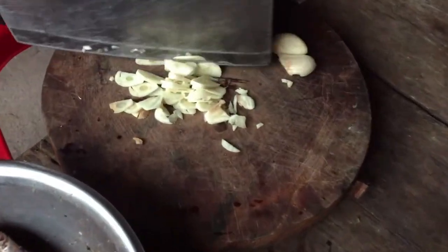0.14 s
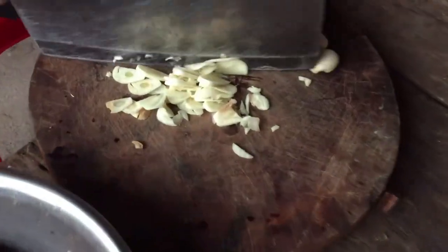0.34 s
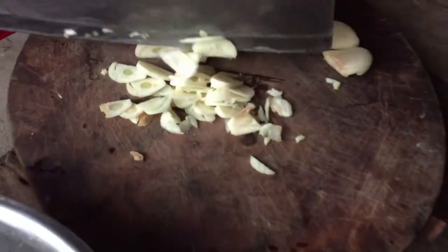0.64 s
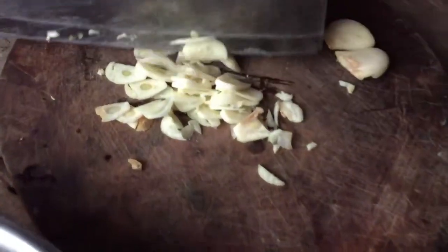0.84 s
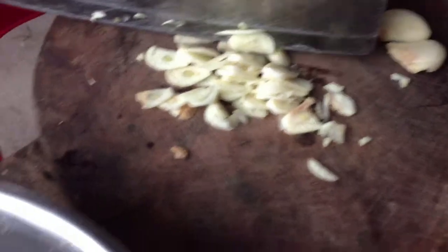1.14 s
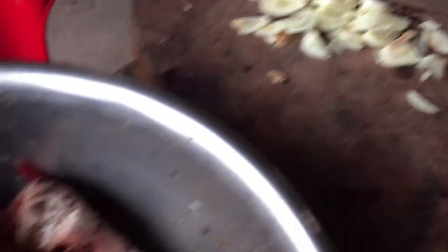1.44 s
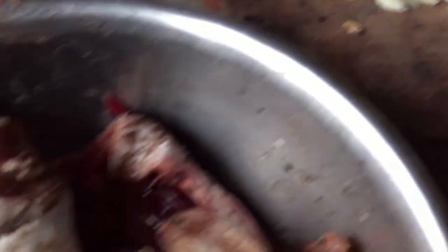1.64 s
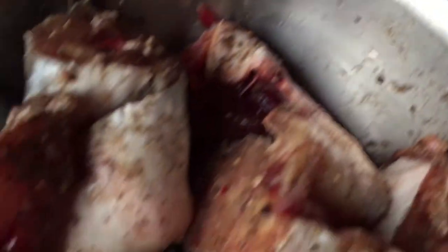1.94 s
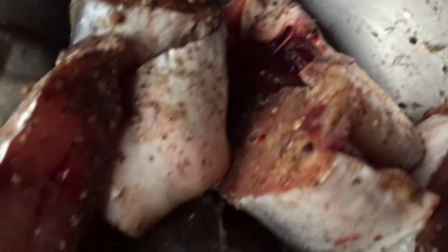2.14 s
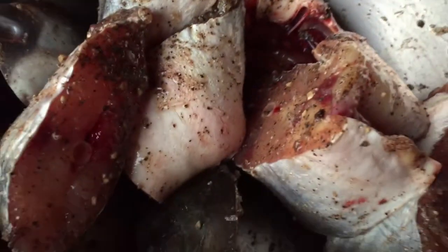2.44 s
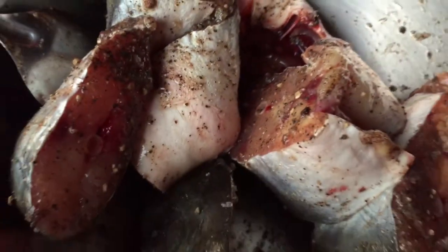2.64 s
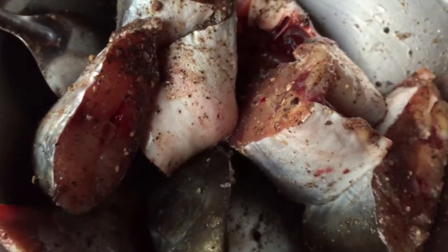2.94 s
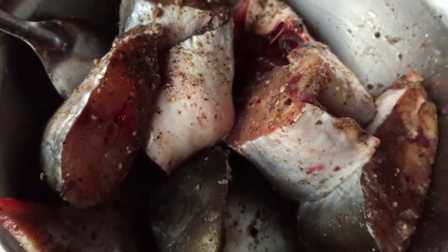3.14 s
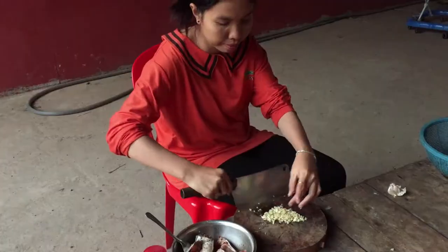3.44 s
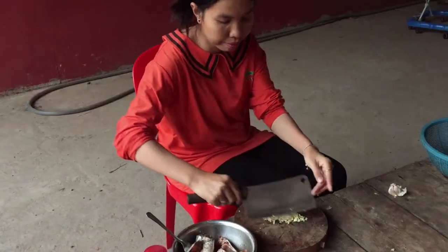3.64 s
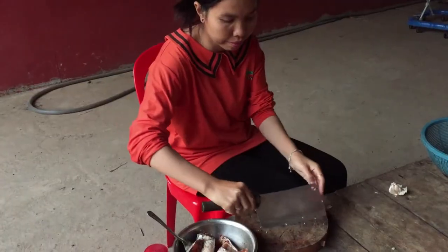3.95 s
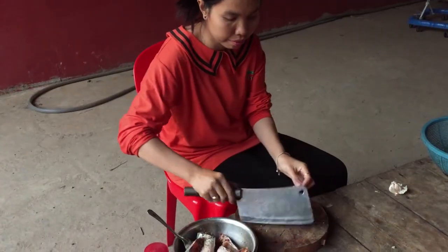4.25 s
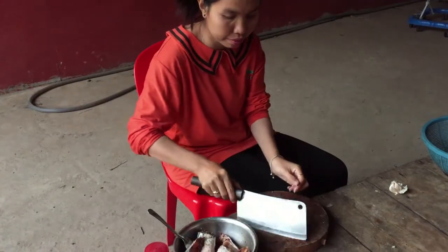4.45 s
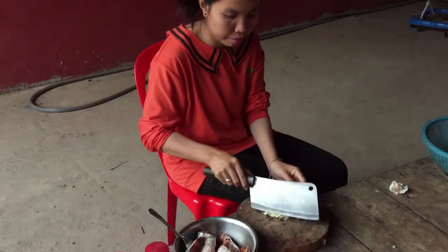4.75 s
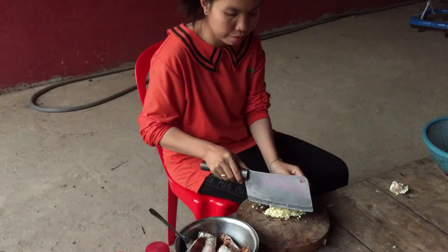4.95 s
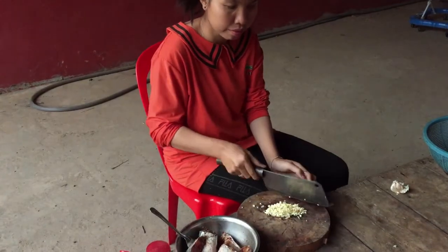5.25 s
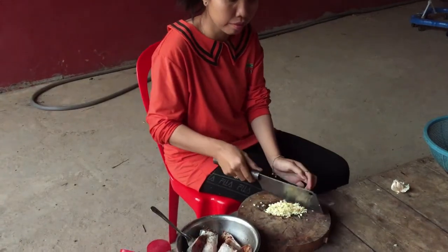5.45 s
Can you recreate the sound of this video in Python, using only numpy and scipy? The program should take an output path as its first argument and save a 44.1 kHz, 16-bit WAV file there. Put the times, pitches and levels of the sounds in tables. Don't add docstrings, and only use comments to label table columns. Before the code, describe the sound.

A close microphone in an open shed catches garlic being cut on a thick wooden board. From 0.2 s a slow, growing crunch with wet snaps leads to a knock at 0.33 s. More crunching brings a low woody knock at 2.0 s, the hardest, sharpest blow at 2.57 s, and a dull one at 3.24 s after a strong crunch. A steel bowl rattles very faintly. Chicks whistle short falling peeps around 4 to 6 kHz throughout, and a hen clucks roughly at 0.06, 0.85, 0.92, 1.5 and 1.66 s, all reverberant. A cut to silence lasts about 0.05 s at 3.37 s. Then, farther off, knocks come at 3.98 s (soft), 4.49 s (loudest of these) and 5.47 s, with scraping blade drags near 4.03, 4.6 and 5.55 s. Low gusty rumble, a distant peeping flock and hiss lie beneath; vehicle noise starts louder at 3.4 s and recedes.

```python
import sys
import numpy as np
from scipy import signal
from scipy.fft import rfft, irfft
from scipy.io import wavfile
from scipy.ndimage import uniform_filter1d

SR = 44100
rng = np.random.default_rng(int(sys.argv[2]) if len(sys.argv) > 2 else 0)


def attenuation_scalar(level_db):
    decades = np.asarray(level_db, float) / 20
    return 10 ** decades


def put_to_file(sound):
    columns = np.atleast_2d(sound).T
    safe = np.clip(columns, -1, 1)
    whole_steps = np.round(safe * 32767)
    wavfile.write(sys.argv[1], SR, whole_steps.astype(np.int16))


N = 246078

# (f/Hz, level/dB, time to fall 60 dB/s)
NEAR_WOOD = [(494, -1.5, 0.014), (585, -4, 0.023), (690, -7.5, 0.029), (847, -9, 0.027), (871.5, 1, 0.011),
             (1048, -7, 0.035), (1095, -7, 0.014), (1185, 1, 0.028), (1340, -11, 0.05), (1585, -4, 0.03),
             (1776, -18, 0.043), (2012, -14, 0.035), (2890, -20, 0.019), (4100, -30, 0.019)]
# (start/s, end/s)
SILENCE = (3.3697, 3.4168)


def near_chops():
    # (t/s, peak level/dB, then re peak: thud/dB, low wood/dB, crack/dB)
    blows = [
        (0.3299, -14, -9, -17, -39),
        (1.9993, -16, -6.5, 13.5, -26),
        (2.5733, -2, -20, -19, -28.5),
        (3.2412, -10, -15.5, -25, -93),
    ]
    landing = [
        [-3, 8, 3, -1, 0.46, -8, -2, -4],
        [5.5, 4, 6.5, -1, -1.1, 6.5, -1, 5.5],
        [-11, 34, 2, 0.9, -1.8, 7, 3.5, 3.5],
        [12, 8, -12, 0.89, 0.15, -19, -18, -2],
    ]
    rebound = [-13.5, -11.5, -9.5, -3]
    bowl_levels = [-38.5, -41, -33, -38.5]
    # (delay/s, level/dB)
    contact = [(0, -4.5), (.00085, -5), (.0017, -1.5), (.00255, -9.5), (.0064, -10)]
    return knocks(blows, landing, rebound, bowl_levels, NEAR_WOOD, contact,
                  board_db=-12.5, thud_db=0.2, tail_db=-17.5, tail_t60=0.068, crack_t60=0.0066, crack_hz=7800)


def far_chops():
    # (t/s, peak level/dB, then re peak: thud/dB, low wood/dB, crack/dB)
    blows = [
        (3.978, -27.5, -22, -2.5, -22),
        (4.487, -15, -43, -12, -32),
        (5.4735, -23.5, -10.5, -6, -25),
    ]
    landing = [
        [1.5, 1, -0.9, 1, -1, 0.91, -1, 1],
        [-2, 1, -1, -2.5, -0.9, 0.86, -1.2, 0.91],
        [3, -1.6, -1.1, 3, -1, -1, -1, 1],
    ]
    rebound = [-4, -14, -13]
    bowl_levels = [-33, -31.5, -32]
    # (delay/s, level/dB)
    contact = [(0, 7.5), (.0014, 11), (.0034, 3.5), (.007, 10), (0.012, -14)]
    # (f/Hz, level/dB, time to fall 60 dB/s)
    board = [(372, 10.5, 0.11), (513, 7, 0.017), (601, 4.5, 0.15), (686, -14, 0.025), (837, -9, 0.08),
             (1015, -17.5, 0.029), (1050, -1, 0.0096), (1176, -10, 0.033), (1340, -10, 0.08),
             (1720, -7, 0.071), (2160, -2.5, 0.031), (2600, 3, 0.02), (2500, 6, 0.018), (2850, -16, 0.091)]
    return knocks(blows, landing, rebound, bowl_levels, board, contact,
                  board_db=-14.0, thud_db=-1.2, tail_db=-23.0, tail_t60=0.17, crack_t60=0.014, crack_hz=5100)


def knocks(blows, landing, rebound_db, bowl_db, board, contact,
           board_db, thud_db, tail_db, tail_t60, crack_t60, crack_hz):
    landing_hz = [470, 620, 830, 1000, 1180, 1550, 2000, 2700]
    # (f/Hz, level/dB, time to fall 60 dB/s)
    table_modes = [(113, -0.5, 0.085), (172.6, 7, 0.031), (180, 8.5, 0.05), (282, 1, 0.042)]
    # (f/Hz, level/dB, time to fall 60 dB/s)
    bowl_modes = [(452, -14, .15), (942, -4, .2), (1040, -7, .35), (1093, -5, .5), (1165, -4, .65),
                  (1215, -7, .4), (1335, -6, .35), (1604, -11, .2), (1771, -13, .2), (1949, -14, .2),
                  (2024, -14, .2), (2180, -19, .15), (860, -6, .15)]
    # (delay/s, level/dB)
    bowl_rings = [
        (0, -7.5),
        (.062, -4.5),
    ]
    # (delay/s, level/dB)
    echoes = [(.0068, -13.5), (0.0139, -15), (0.035, -21), (.066, -25), (0.08, -31)]
    # (f/Hz, level/dB per Hz)
    wood_tail = [(200, -25), (400, 6.5), (1100, 4.5), (2000, -12), (3000, -11.5), (5000, -20.5)]
    rebound_s = 0.0054
    tail_follows = 0.6

    s, db, thud, low, crack = np.transpose(blows)
    spread = rng.normal(0, 1.5, (len(s), len(board)))
    board_hz = np.array(board)[:, 0]
    spot = np.array([at_hz(np.c_[landing_hz, row], board_hz) for row in landing])
    face, rim = np.zeros(N), np.zeros(N)
    rim_sign = 1
    for k, (hz, level, t60) in enumerate(board):
        blow_db = db + level + board_db + spread[:, k] + spot[:, k]
        blow_db = blow_db + low * (hz < 870) + (crack - crack.mean()) / 2 * (hz > 1700)
        mode = ring(strike(s, blow_db), hz, t60)
        if 870 < hz < 1480:
            face += mode
        else:
            rim += rim_sign * mode
        rim_sign = -rim_sign

    table = sum((-1) ** k * ring(strike(s + 0.0027, db + thud + level + thud_db), hz, t60)
                for k, (hz, level, t60) in enumerate(table_modes))
    edge = puff(s, db + crack, crack_t60)
    edge = signal.sosfilt(signal.butter(2, 1800, "high", fs=SR, output="sos"), edge)
    tail_clicks = strike(s + 0.0032, tail_follows * db + tail_db)
    tail_level = signal.lfilter([1], [1, -attenuation_scalar(-60 / (tail_t60 * SR))], tail_clicks)
    dense = colour(rng.standard_normal(N), wood_tail) * tail_level
    bounce = repeat(face * attenuation_scalar(along(s, rebound_db)), [(rebound_s + lag, level) for lag, level in contact[:4]])
    bowl_clicks = strike(s + 0.004014, db + bowl_db)
    bowl = sum((-1) ** k * attenuation_scalar(level + 4.6 * drift(45)) * ring(bowl_clicks, hz, t60)
               for k, (hz, level, t60) in enumerate(bowl_modes))

    direct = repeat(face, contact) + bounce + rim + table + edge + repeat(bowl, bowl_rings)
    knock = direct + repeat(direct, echoes) + dense
    return signal.sosfilt(signal.butter(3, crack_hz, fs=SR, output="sos"), knock)


def crunch():
    # (start/s, length/s, start level/dB, end level/dB)
    bites = [
        (0.172, 0.17, -79, -55),
        (0.51, 0.0052, -74, -74),
        (1.784, 0.051, -72, -74),
        (1.873, 0.049, -62.5, -71),
        (1.931, 0.07, -67.5, -56.5),
        (2.45, .006, -75, -79),
        (2.488, 0.0807, -83, -53.5),
        (3.014, 0.023, -92, -71.5),
        (3.135, 0.11, -65.5, -50),
        (3.36, 0.011, -79, -79),
    ]
    # (t/s, peak level/dB)
    fibres = [(0.0458, -56), (0.155, -51), (0.2174, -40), (0.2462, -36), (0.2573, -28), (0.279, -21.5),
              (0.297, -23.5), (0.3296, -46), (1.781, -55), (1.8751, -59), (1.949, -36), (1.996, -29),
              (2.4633, -60), (2.5277, -42), (2.5546, -41), (2.7926, -50), (3.1338, -56), (3.1921, -47),
              (3.203, -30), (3.225, -23), (3.368, -48)]
    # (f/Hz, level/dB per Hz)
    crunch_colour = [(3820, -26), (6500, -10), (7030, -11), (7430, -13.5), (10100, -16), (11600, -13),
                     (15800, -25)]
    # (f/Hz, time to fall 60 dB/s, level/dB)
    edge_rings = [
        (6950, .03, -16),
        (11600, .008, -24),
    ]
    # (start/s, length/s, start level/dB, end level/dB)
    edge_free = (.1, .19, 6, -6)
    attack, release, settle_fade = 2300, 3800, 170
    settle_db, damped_db = -12.5, -12

    settling = [(s + long, 0, end + settle_db, end + settle_db) for s, long, _, end in bites]
    level = swells(bites, attack, release) + swells(settling, attack, settle_fade)
    raw = rms_one(grains(7000.0 * attenuation_scalar(4.5 * drift(70)), 3.6)) * level
    bright = colour(raw, [(1500, -3), (4000, -1), *crunch_colour[1:]])
    bright = bright * np.sqrt(np.mean(level ** 2)) * attenuation_scalar(10.5)
    body = attenuation_scalar(-19.5) * sum(attenuation_scalar(db) * ring(raw, hz, t60) for hz, db, t60 in NEAR_WOOD)
    s, db = np.transpose(fibres)
    snaps = puff(s, db - 17.0, 0.034)
    snaps = signal.sosfilt(signal.butter(2, [1200, 13000], "band", fs=SR, output="sos"), snaps)
    free = attenuation_scalar(damped_db) + swells([edge_free], attack, release)
    blade = sum(attenuation_scalar(db + 1.6 * drift(25)) * ring(raw * free, hz, t60) for hz, t60, db in edge_rings)
    return bright + body + snaps + blade


def scrape():
    # (start/s, length/s, rasp at start/dB, at end/dB, ringing re rasp/dB, lift of resonances 3/4
    # octave from 4140 Hz/dB)
    strokes = np.array([
        (3.975, 0.0036, -82, -81, -10, 18),
        (4.032, 0.085, -72, -71.5, -5.5, 8.5),
        (4.59, 0.12, -66.5, -66, 2, 0),
        (5.471, 0.0076, -77, -79, -8, 8),
        (5.544, 0.027, -68, -69.5, -4.5, 1),
    ])
    # (f/Hz, width/Hz, level/dB)
    blade = [(1023, 22, -1), (1140, 40, -10), (1365, 40, -10), (1450, 40, -10), (1680, 24, -5),
             (1910, 15, -15), (2245, 40, -18), (2390, 90, -15), (2700, 24, -10), (3138, 24, -10),
             (3214, 30, -14), (3555, 22, -19), (3720, 22, -12), (4140, 17, 4), (4310, 60, -18),
             (4740, 40, -11), (5300, 29, -20), (5600, 77, -19), (6190, 23, -23), (6470, 39, -20),
             (6710, 37, -19), (7210, 37, -22), (7830, 30, -19), (7940, 18, -15), (8090, 50, -20),
             (8730, 40, -27), (9650, 50, -27), (11200, 32, -26), (11700, 71, -28), (12100, 39, -32),
             (12586, 24, -18), (13700, 54, -31), (14900, 97, -44)]
    # (t/s, level/dB)
    flat_knock = (5.4745, -49)
    # (f/Hz, level/dB, time to fall 60 dB/s)
    flat_modes = [(2240, -9, .2), (2700, 0, .4), (3138, 0, .45), (3720, -6, .35)]
    stroke_attack, touch_attack, release = 520, 2300, 330
    touch_s = .015

    level = sum(swells([row[:-2]], stroke_attack if row[1] > touch_s else touch_attack, release)
                for row in strokes)
    middle = strokes[:, 0] + strokes[:, 1] / 2
    ringing, tilt = along(middle, strokes[:, -2]), along(middle, strokes[:, -1])
    raw = rms_one(grains(3500.0 * attenuation_scalar(2.3 * drift(29)), 2.2)) * level
    sung = np.zeros(N)
    for hz, width, db in blade:
        push = raw * attenuation_scalar(ringing + tilt * np.sin(np.pi * np.log2(hz / 4140) / 1.5) ** 2)
        sung += attenuation_scalar(db + 2.5 * drift(10)) * width * ring(push, hz, 2.2 / width)
    rasp = colour(raw, [(500, -27), (1000, -41), (2500, -8.5), (4000, 10.5), (7000, 5.5), (10500, 1.0),
                        (13500, -24), (15500, -44)])
    knocked = sum(ring(strike([flat_knock[0]], [flat_knock[1] + db]), hz, t60) for hz, db, t60 in flat_modes)
    return knocked + attenuation_scalar(-34.0) * sung + attenuation_scalar(14.0) * np.sqrt(np.mean(level ** 2)) * rasp


def peeps():
    # (top of pitch/s, top f/Hz, end f/Hz, level/dB, fall/s)
    caller = [(.274, 5590, 3950, -50, 0.07), (0.665, 5600, 3750, -50, 0.07),
              (1.184, 5450, 3850, -51, 0.055), (1.572, 5430, 3750, -52, 0.058),
              (1.906, 5470, 3580, -55.5, .065), (2.262, 5590, 5500, -59.5, 0.022),
              (3.105, 5170, 5050, -54, .022), (2.705, 5150, 4000, -56.5, 0.041)]
    # (top of pitch/s, top f/Hz, end f/Hz, level/dB)
    quick = [(.014, 5680, 4470, -47.5), (1.54, 4900, 4700, -80), (3.44, 5934, 5100, -54.5),
             (3.503, 5550, 4250, -59), (3.713, 5760, 4680, -53), (3.893, 5880, 3950, -57),
             (4.288, 5870, 4000, -58), (4.435, 5220, 4050, -56.5), (4.512, 5850, 4600, -54),
             (4.765, 4690, 3920, -60), (5.115, 5730, 3560, -61.5), (5.511, 5680, 5100, -51)]
    # (top of pitch/s, top f/Hz, end f/Hz, level/dB, fall/s)
    hooks = [(.76, 5920, 6100, -66, 0.02), (1.345, 5860, 5730, -61, 0.017), (1.775, 5770, 5600, -66, .02),
             (1.794, 5530, 4300, -55.5, 0.038), (2.11, 5710, 4900, -52.5, 0.04),
             (2.266, 6260, 6130, -65, 0.0088), (2.421, 5860, 5040, -48, 0.039),
             (2.754, 5850, 3950, -49.5, 0.039), (3.065, 5950, 4895, -48.5, 0.08),
             (3.343, 6160, 6270, -57.5, 0.012), (3.714, 6300, 6130, -61, 0.076),
             (3.969, 5800, 5800, -54.5, 0.022), (4.42, 6480, 6470, -63, .05),
             (4.731, 5720, 5430, -53, 0.048), (5.066, 5730, 4430, -54, 0.042),
             (5.1, 6440, 6450, -63, 0.043), (5.277, 5880, 4400, -57, 0.03), (5.4, 5920, 5800, -77, 0.081)]
    # (start/s, start f/Hz, end f/Hz, level/dB, fall/s)
    fragments = [(2.276, 4950, 4050, -53, .048), (1.53, 5200, 4800, -60, 0.045),
                 (3.135, 7500, 6800, -64, .016), (2.79, 7600, 6500, -67, .016),
                 (2.3, 3700, 4250, -71, 0.029), (4.7, 4600, 3100, -78, 0.02),
                 (3.864, 4700, 4000, -67, .022), (4.12, 5000, 4200, -67, .025), (3.8, 4600, 4100, -69, .02),
                 (5.018, 5150, 5050, -68, 0.016), (5.164, 4600, 4020, -66, 0.027),
                 (5.194, 4100, 3200, -67, 0.015), (5.211, 4600, 3100, -70, 0.016),
                 (3.122, 5200, 4000, -52.5, .026)]
    # (f/Hz, level/dB)
    beak_colour = [(3000, -14), (3650, 0), (4300, 5), (5000, -3.5), (5500, -8), (6500, -12)]
    # (start/s, length/s, start f/Hz, end f/Hz, level/dB)
    whistles = [
        (0.368, 0.021, 2820, 2890, -66),
        (2.265, 0.062, 3160, 3066, -67),
        (4.211, 0.039, 3490, 3440, -64.5),
        (4.332, 0.074, 3264, 3068, -56.5),
        (5.229, .12, 3500, 3052, -56),
    ]
    # rise/s, share of pitch gained in the rise, how much the fall quickens
    calls = [(*row, .04, .018, 1.2) for row in caller]
    calls += [(*row, .005, 0, 1) for row in fragments]
    calls += [(*row, (row[1] - row[2]) / 40000, 0.029, .018, 1.2) for row in quick]
    calls += [(*row, .065, .055, 2.2) for row in hooks]

    out = np.zeros(N + 2 * SR)
    for top_s, top_hz, end_hz, db, fall, rise, gained, bend in calls:
        up = np.linspace(-1, 0, int(rise * SR))
        down = np.linspace(0, 1.12, int(1.12 * fall * SR))
        hz = np.r_[top_hz * (1 - gained * up ** 2), top_hz - (top_hz - end_hz) * down ** bend]
        swell = np.sin(np.pi * np.linspace(0, 1, len(hz))) ** 0.67
        phase = 2 * np.pi * np.cumsum(hz) / SR
        tone = np.sin(phase) + attenuation_scalar(-37.0) * np.sin(2 * phase)
        at = SR + round((top_s - rise) * SR)
        out[at:at + len(hz)] += attenuation_scalar(db + at_hz(beak_colour, hz)) * swell * tone

    s, long, start_hz, end_hz, db = np.transpose(whistles)
    times = np.c_[s, s + long / 2, s + 1.5 * long]
    hz = along(times, np.c_[start_hz, end_hz + .3 * (start_hz - end_hz), end_hz])
    level = swells(np.c_[s, long, db, db - 5], 1200, 480)
    phase = 2 * np.pi * np.cumsum(hz * (1 + .009 * drift(80))) / SR
    whistle = level * attenuation_scalar(2.2 * drift(30)) * np.sin(phase)
    return (out[SR:SR + N] + whistle) * attenuation_scalar(3.5 * drift(104))


def hen():
    # (start/s, length/s, pitch f/Hz, level/dB, beak opening/dB per octave)
    clucks = [
        (0.063, 0.082, 419.6, -59.5, 6.5),
        (.85, 0.04, 434.5, -52.5, 2.5),
        (0.918, 0.057, 428.4, -57, 1),
        (1.491, 0.1, 379, -52, 1),
        (1.658, 0.19, 373.4, -56.5, -9),
    ]
    # (f/Hz, level/dB)
    throat = [(300, -22), (440, -6), (800, -12), (1200, 1), (1500, -4), (1820, -11), (2200, -6),
              (2900, -18), (3500, -13)]
    s, long, pitch, db, beak = np.transpose(clucks)
    times = np.c_[s, s + long]
    hz = along(times, np.c_[pitch, pitch - 50 * long])
    opening = along(times, np.c_[beak, beak - 15 * long])
    level = swells(np.c_[s, long, db, db - 4], 330, 400)
    phase = 2 * np.pi * np.cumsum(hz * (1 + .015 * drift(50))) / SR
    voiced = np.zeros(N)
    for k in range(1, 10):
        lift = opening * np.maximum(np.log2(k / 3), 0)
        voiced += attenuation_scalar(at_hz(throat, k * hz) + lift + 3.5 * drift(25)) * np.sin(k * phase)
    breath = attenuation_scalar(-4) * colour(rng.standard_normal(N), throat)
    return level * (voiced * (1 + .3 * np.sin(phase / 2)) + breath)


def shed(x):
    t = np.arange(SR) / SR
    tail = rng.standard_normal(SR) * attenuation_scalar(-60 * t / 0.58) * np.minimum(t / 0.0041, 1)
    tail = signal.sosfilt(signal.butter(1, 12900, fs=SR, output="sos"), tail)
    return signal.fftconvolve(x, tail / np.sqrt(np.sum(tail ** 2)))[:N]


def wind():
    # (t/s, level/dB)
    gusts = [(0, -47), (1.2, -50), (2, -47), (3.3, -44.5), (4.101, -47), (5, -51.5), (5.58, -47)]
    # (f/Hz, level/dB per Hz)
    rumble = [(14, -33), (24, -6), (65, 2), (155, -2), (233, -9), (316, -18), (500, -27.5), (650, -22),
              (1100, -120)]
    return attenuation_scalar(along(*np.transpose(gusts))) * patchy(rumble, 4.15, 4.1)


def road():
    # (start/s, length/s, start level/dB, end level/dB)
    passing = [
        (2.73, 0.31, -64, -62),
        (3.42, 1.82, -42.5, -63.5),
    ]
    # (f/Hz, level/dB per Hz)
    traffic = [(180, -24), (300, -5.5), (432, -14), (711, -7.5), (822, -5), (913, -1.5), (1260, -5.5),
               (1490, -0.5), (3600, -20.5), (4680, -59), (7920, -120)]
    # (start/s, length/s, start level/dB, end level/dB)
    tyre_roar = (5, 1.6, -54.5, -67)
    # (f/Hz, level/dB per Hz)
    tyre_bands = [(850, -11.5), (1000, -2), (1200, -19), (1450, -2), (1670, 9), (1800, -1), (2200, -8)]
    attack, release = 470, 21
    level = attenuation_scalar(-65) + swells(passing, attack, release)
    tyres = swells([tyre_roar], release, release) * patchy(tyre_bands, 3.0, 10.0)
    return level * patchy(traffic, 2.75, 10.0) + tyres


def distant_flock():
    # (t/s, level/dB)
    flock_level = [(0, -57), (1, -66.5), (1.999, -55), (3.4, -61.5), (4.4, -60), (5.58, -61)]
    # (f/Hz, level/dB per Hz)
    first_colour = [(1590, -19), (2700, -9.5), (3550, 1), (4200, -0.5), (5020, -19), (5540, -13),
                    (6120, -15), (6600, -21.5), (8580, -32), (14500, -120)]
    # (f/Hz, level/dB per Hz)
    far_colour = [(1590, -60), (2700, -16), (3520, 3.5), (3850, -4), (4390, -12), (4930, -14), (5620, 0),
                  (6600, -23), (8580, -62), (14500, -120)]
    t = np.arange(N) / SR
    lingering = attenuation_scalar(-47.5 - 91 * t)
    level = attenuation_scalar(along(*np.transpose(flock_level))) + lingering
    return level * np.where(t < SILENCE[1], patchy(first_colour, 6.1, 3.9), patchy(far_colour, 5.4, 1.93))


def hiss():
    # (f/Hz, level/dB per Hz)
    hiss_colour = [(3530, -31), (6000, 0.5), (8730, 1.5), (10300, -5), (12100, -1.5), (15800, -11)]
    return attenuation_scalar(-80.5) * patchy(hiss_colour, 1.0, 15.0)


def rms_one(x):
    return x / np.sqrt(np.mean(x ** 2) + 1e-20)


def at_hz(points, hz):
    return np.interp(np.log(hz), np.log(np.array(points)[:, 0]), np.array(points)[:, 1])


def drift(rate):
    r = np.exp(-80 * np.pi * rate / SR)
    slow = signal.lfilter([1], [1, -2 * r, r * r], rng.standard_normal(N // 40 + 2002))[2000:]
    return np.interp(np.arange(N) / 40, np.arange(len(slow)), rms_one(slow))


def colour(x, spectrum):
    hz = np.fft.rfftfreq(N, 1 / SR) + 1
    (low_hz, low_db), (high_hz, high_db) = spectrum[0], spectrum[-1]
    closed = [(low_hz * .8, low_db - 40), *spectrum, (high_hz * 1.1, high_db - 40)]
    return rms_one(irfft(rfft(x) * attenuation_scalar(at_hz(closed, hz)), N))


def patchy(spectrum, patchy_db, rate):
    halves = sum(rng.standard_normal(N) * attenuation_scalar(patchy_db * drift(rate)) for _ in range(2))
    return colour(halves, spectrum)


def ring(clicks, hz, t60):
    r, w = attenuation_scalar(-60 / (t60 * SR)), 2 * np.pi * hz / SR
    return signal.lfilter([0, np.sin(w)], [1, -2 * r * np.cos(w), r * r], clicks + 1e-18)


def strike(times, levels_db):
    clicks = np.zeros(N)
    clicks[np.round(np.array(times) * SR).astype(int)] = attenuation_scalar(np.array(levels_db))
    return clicks


def puff(times, levels_db, t60):
    level = signal.lfilter([1], [1, -attenuation_scalar(-60 / (t60 * SR))], strike(times, levels_db))
    return level * rng.standard_normal(N)


def grains(per_s, size_db):
    happens = rng.random(N) < per_s / SR
    size = attenuation_scalar(size_db * np.minimum(rng.exponential(1, N), 5))
    return happens * size * rng.choice([-1, 1], N)


def repeat(x, taps):
    return sum(attenuation_scalar(db) * np.r_[np.zeros(round(lag * SR)), x][:N] for lag, db in taps)


def along(s, values):
    return np.interp(np.arange(N) / SR, np.ravel(s), np.ravel(values))


def swells(rows, attack, release):
    t = np.arange(N) / SR
    total = 0
    for s, long, a, b in rows:
        before, after = np.maximum(s - t, 0), np.maximum(t - s - long, 0)
        total = total + attenuation_scalar(along([s, s + long], [a, b]) - attack * before - release * after)
    return total


def scene():
    near = near_chops() + crunch()
    far = far_chops() + scrape()
    chicks, cluck = peeps(), hen()
    dulled = signal.sosfilt(signal.butter(3, 5240, fs=SR, output="sos"), chicks)
    wet = shed(attenuation_scalar(-17.5) * near + attenuation_scalar(-10.5) * far + attenuation_scalar(8) * dulled + attenuation_scalar(-2.0) * cluck)
    background = wind() + road() + distant_flock() + hiss()
    return (near + far + attenuation_scalar(5.5) * chicks + attenuation_scalar(-5.0) * cluck + wet + background)[None]


def low_pass(x):
    return signal.sosfilt(signal.butter(12, 15900, fs=SR, output="sos"), x)


def record(dry):
    # (start/s, length/s, lost above f/Hz)
    treble_gaps = [(.437, .012, 6500), (.812, .026, 6500), (1.018, .012, 5000), (1.064, .012, 5000),
                   (1.55, .014, 6000), (1.966, .018, 5500), (3.177, .01, 6600), (4.038, .01, 8500),
                   (4.62, .15, 14200), (4.71, .014, 6000), (4.76, .012, 6000), (4.94, .048, 3800)]
    t = np.arange(N) / SR
    heard = 1.1 * np.tanh(dry / 1.1)
    heard = signal.sosfilt(signal.butter(4, 40.0, "high", fs=SR, output="sos"), heard)
    loud, faint = [signal.sosfiltfilt(signal.butter(4, band, "band", fs=SR, output="sos"), heard)
                   for band in ([5000, 6100], [6150, 7800])]
    masked = uniform_filter1d(loud ** 2, 1024) > attenuation_scalar(44) * uniform_filter1d(faint ** 2, 1024)
    heard = heard - faint * uniform_filter1d(np.roll(masked, 600) * 1., 700)
    for s, long, hz in treble_gaps:
        treble = signal.sosfiltfilt(signal.butter(6, hz, "high", fs=SR, output="sos"), heard)
        gap = uniform_filter1d(((t > s) & (t < s + long)) * 1., 200)
        heard = heard - .9 * treble * gap
    sounding = uniform_filter1d(((t < SILENCE[0]) | (t > SILENCE[1])) * 1., size=80)
    return low_pass(heard * sounding)


dry = scene()
out = record(dry)
put_to_file(out)
```